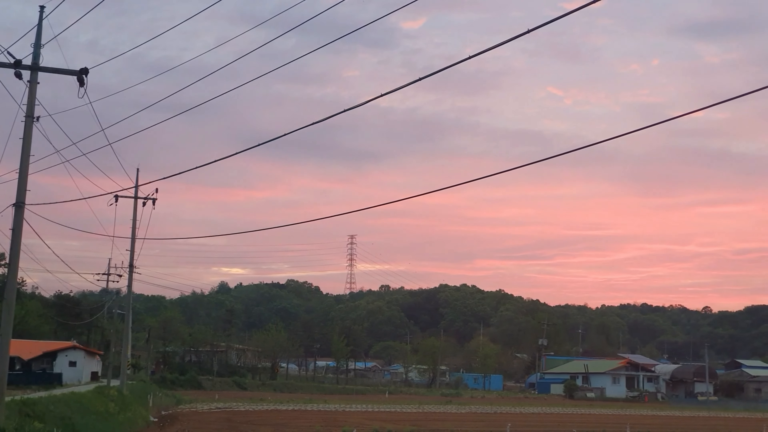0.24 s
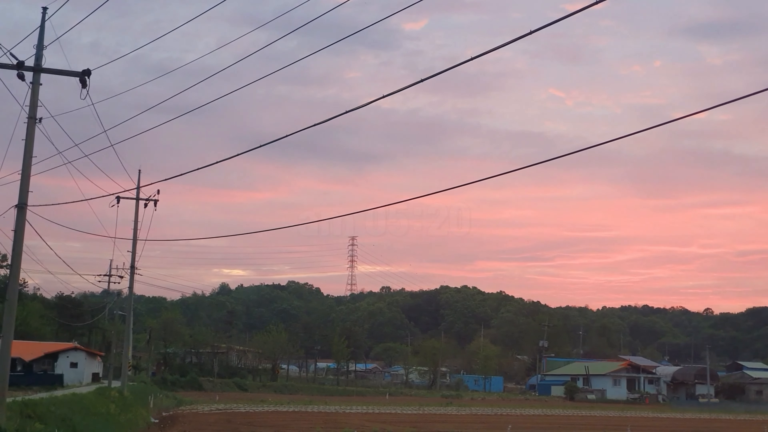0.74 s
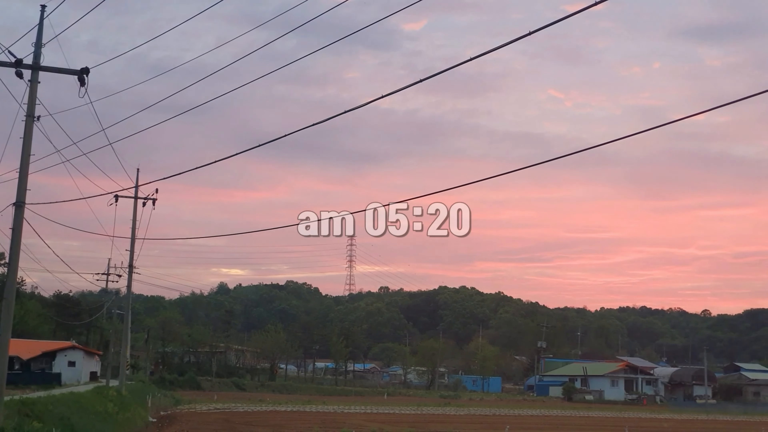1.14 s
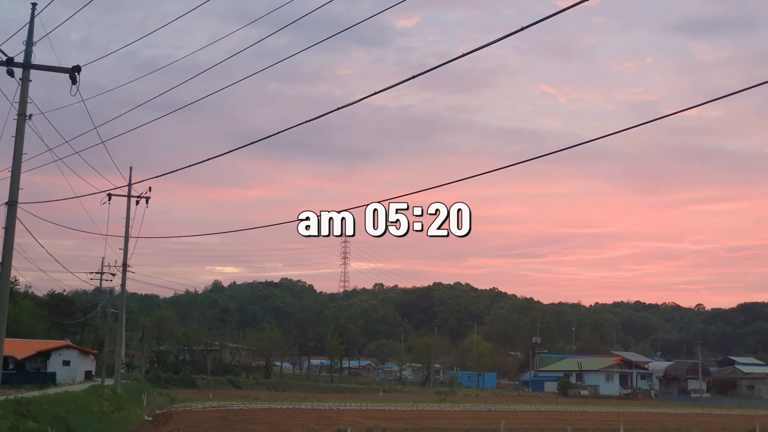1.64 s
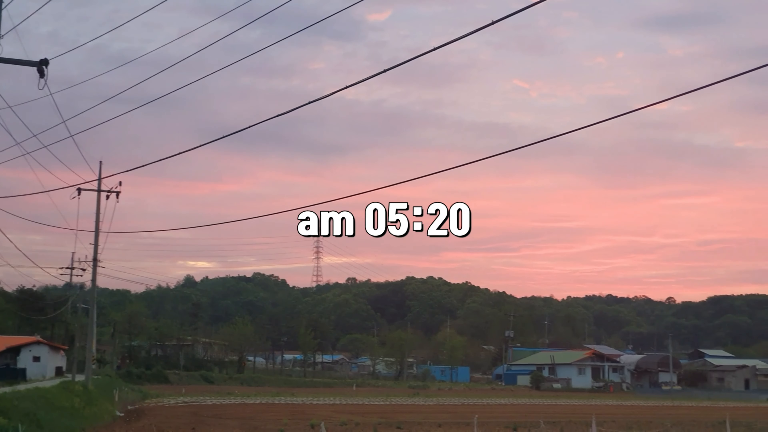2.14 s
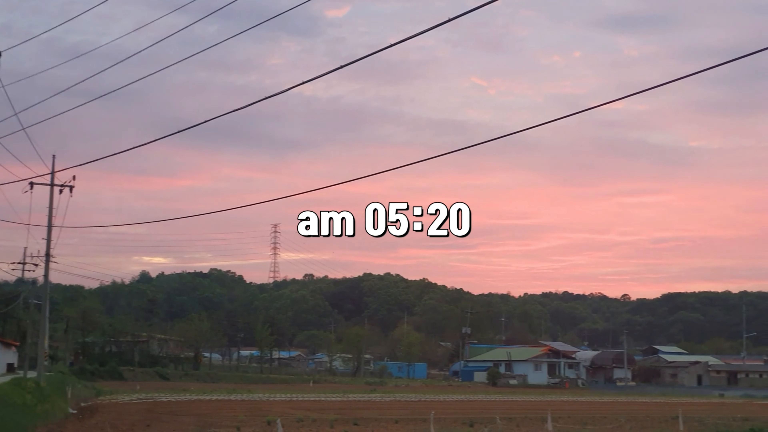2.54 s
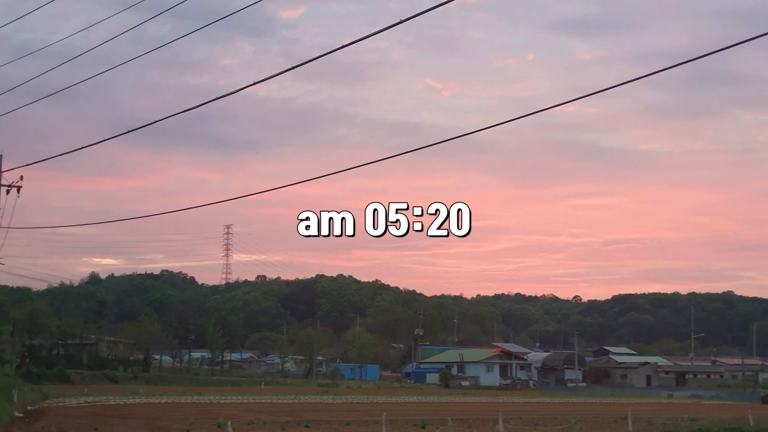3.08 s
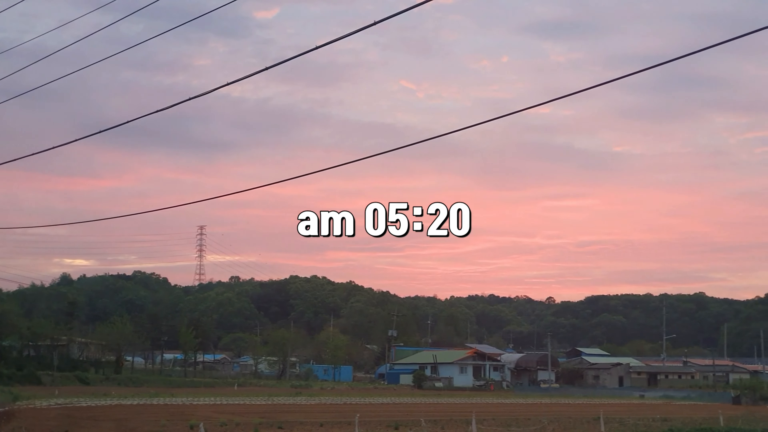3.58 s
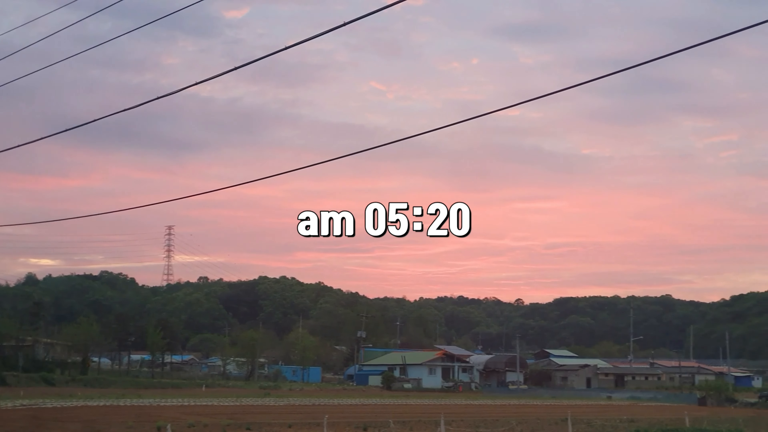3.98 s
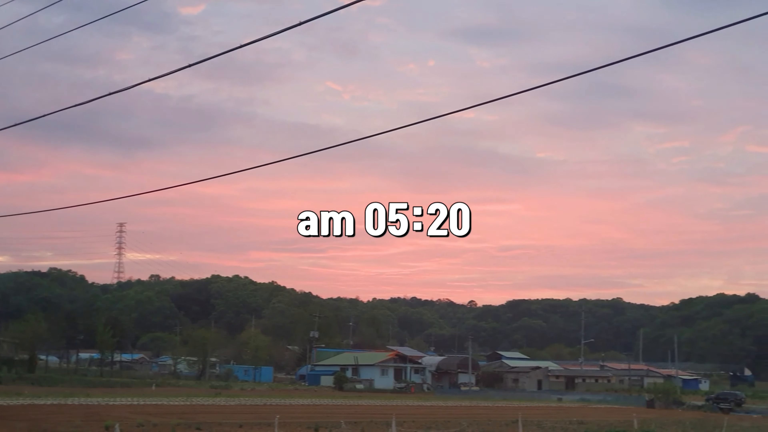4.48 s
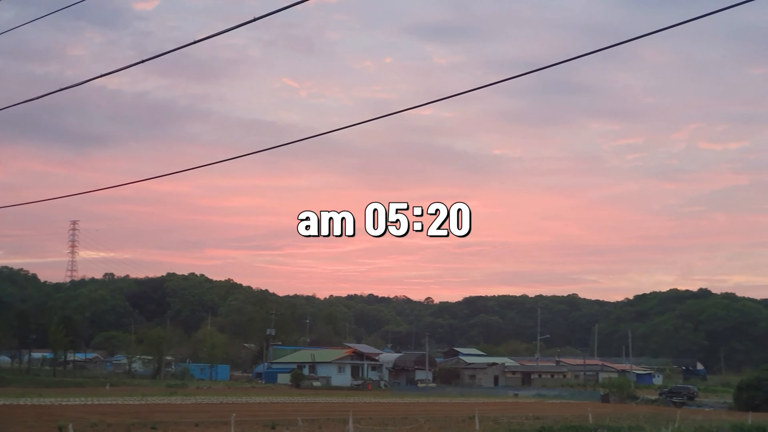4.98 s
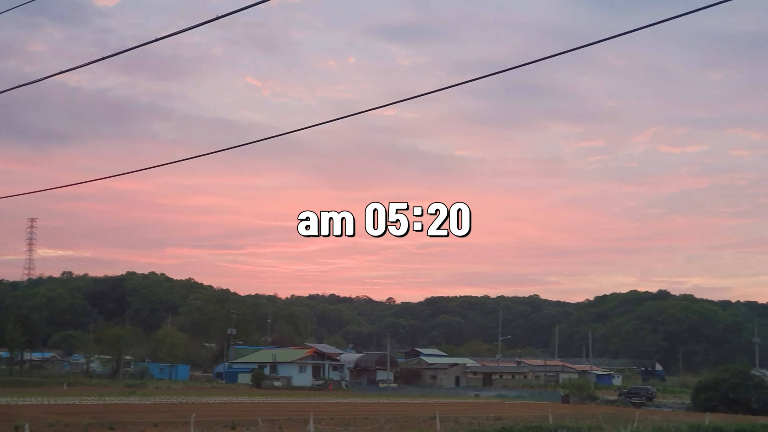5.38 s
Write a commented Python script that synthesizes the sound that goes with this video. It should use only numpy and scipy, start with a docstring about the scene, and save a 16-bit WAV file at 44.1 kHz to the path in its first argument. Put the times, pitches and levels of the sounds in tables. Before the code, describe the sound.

A dawn chorus of small birds chirping, trilling and whistling over open fields, while a distant cow moos once and a frog croaks near the end.

```python
"""After a moment of silence small birds twitter nearby, over faint air, a low hum and a far dawn chorus.
Others whistle long arcs; a far cow moos once and a frog croaks, by fields at the edge of a village.
Birds are gliding sines with warble and buzz; cow and frog are pulses ringing throat resonances;
the air is coloured noise. House fronts repeat the near callers and trees give them a soft tail.
Two closely spaced microphone ports hear callers with small lags and level differences."""
import sys
import numpy as np
from scipy import signal
from scipy.fft import rfft, irfft, next_fast_len
from scipy.io import wavfile
from scipy.ndimage import uniform_filter1d

SR = 44100
rng = np.random.default_rng(int(sys.argv[2]) if len(sys.argv) > 2 else 0)


def master(y):
    """Save y as 16-bit WAV."""
    cut = np.clip(np.atleast_2d(y).T, -1, 1)
    pcm = np.round(cut * 32767)  # scale
    wavfile.write(sys.argv[1], SR, pcm.astype(np.int16))


N = 247842
TIME = np.arange(N) / SR
STROKE = np.linspace(0, 1, 97)  # progress through one bird note


def undb(db):
    """Decibels to gain."""
    return 10 ** (np.asarray(db) / 20)


def unit(x):
    """Scale to rms 1."""
    return x / np.sqrt(np.mean(x ** 2) + 1e-18)


def walk(rate, size=N):
    """Smooth random wander with a spread near 1, drawing new steps at the given rate in Hz."""
    k = max(int(SR / rate), 1)
    steps = np.repeat(rng.standard_normal(size // k + 2), k)
    return 1.3 * uniform_filter1d(uniform_filter1d(steps, k), k)[:size]


def band(x, hz, width_hz):
    """A resonance applied twice, so that its skirts are steep."""
    b, a = signal.iirpeak(min(hz, .45 * SR), hz / width_hz, fs=SR)
    return signal.lfilter(b, a, signal.lfilter(b, a, x))


def gliding_band(x, hz, width_hz):
    """A steep resonance whose centre moves: shift it down to zero, low-pass, shift back up."""
    turn = np.exp(2j * np.pi * np.cumsum(hz) / SR)
    b, a = signal.butter(2, width_hz / 2, fs=SR)
    return 2 * np.real(turn * signal.lfilter(b, a, x / turn))


def ports(x, pan_db, lag_ms):
    """One caller at both ports: a left minus right level difference and a small delay on the right."""
    size = next_fast_len(len(x) + 64)
    turn = np.exp(-2j * np.pi * np.fft.rfftfreq(size, 1 / SR) * lag_ms / 1000)
    late = irfft(rfft(x, size) * turn, size)[:len(x)]
    gains = unit(undb([[pan_db / 2], [-pan_db / 2]]))
    return gains * np.array([x, late])


def add(out, s, x):
    """Mix x into out from time s in seconds."""
    i = int(np.clip(s * SR, 0, N - 1))
    out[..., i:i + x.shape[-1]] += x[..., :N - i]


def scatter(x, t60_s, build_s):
    """Countless weak echoes off leaves and walls, different at each port."""
    t = np.arange(int(1.5 * SR)) / SR
    envelope = np.exp(-np.log(1000) * t / t60_s) * (1 - np.exp(-t / build_s))
    tail = rng.standard_normal((2, len(t))) * envelope
    tail /= np.sqrt(np.sum(tail ** 2, axis=1, keepdims=True))
    return signal.fftconvolve(np.atleast_2d(x), tail, axes=1)[:, :N]


def arc(hz, glide, arch=0.039):
    """Pitch of a note that glides by some octaves, its ends lying a share (arch) under its middle."""
    return hz * (1 - arch * (2 * STROKE - 1) ** 2) * 2 ** (glide * (STROKE - .5))


def lean(hz, centre_hz=4650, db_per_octave=17.5):
    """Left minus right dB of a note: low notes lean to the left, high ones to the right."""
    return db_per_octave * np.log2(centre_hz / hz)


def note(length, pitches, harsh, push, warble_hz=220, warble_rate=200, buzz_hz=560, buzz_jitter=0.239,
         buzz_swing_hz=440, split_hz=650, second_side=1.0, grain=1.0, octave_db=-34, rasp_db=-19):
    """A quick bird note; harsh ones warble and buzz, and the syrinx's other side joins in lower."""
    u = np.linspace(0, 1, max(int(length * SR), 64))
    rates = (warble_rate, warble_rate, 1300, SR)
    wobble, flutter, shake, hiss = (walk(rate, SR // 7)[:len(u)] for rate in rates)
    glide_hz = np.interp(u, np.linspace(0, 1, len(pitches)), pitches)
    hz = glide_hz + harsh * warble_hz * wobble
    buzz = np.sin(2 * np.pi * np.cumsum(buzz_hz * (1 + buzz_jitter * flutter)) / SR)
    upper = 2 * np.pi * np.cumsum(hz + harsh * buzz_swing_hz * buzz) / SR
    lower = 2 * np.pi * np.cumsum(hz - split_hz + harsh * warble_hz * flutter) / SR
    both_sides = np.sin(upper) + harsh * second_side * np.sin(lower)
    tone = both_sides * (1 + harsh * grain * (shake + buzz))
    # a hard push of air adds the octave and a rasp that reaches far into the treble
    rasp = harsh * undb(rasp_db) * np.gradient(hiss)
    overtones = push * (undb(octave_db) * np.sin(2 * upper) + rasp)
    envelope = np.sqrt(np.abs(np.sin(np.pi * u))) * signal.windows.tukey(len(u), .25)
    return unit((tone + overtones) * envelope)


def air(wide_hz=900, level_db=-52.5, treble_db=-3):
    """Faint outdoor noise: the bass is restless and alike at both ports, the treble smooth and wide."""
    # colour of still morning air: pitch_hz [Hz], relative level_db [dB per Hz]
    air_colour = [(15, -30), (25, 7), (82, -0.5), (188, -5.5), (281, -6.5), (997, -18.5), (1490, -19.5),
                  (2560, -17), (3630, -26.5), (7300, -16.5), (9300, -32), (12200, -26), (15500, -28)]
    # distant rumble, relative gains: start_s [s], bass_db [dB], low_middle_db [dB]
    rumble = [(0.3, 1.5, 4.5), (0.7, 0, -2.5), (1.3, -0.5, 0), (2.05, 2.5, 3), (3.2, 5, 1.5),
              (4.5, 0.5, 3.5), (5.3, 5, 2)]
    points_hz, points_db = np.transpose(air_colour)
    hz = np.fft.rfftfreq(N, 1 / SR) + 1
    colour = undb(np.interp(np.log(hz), np.log(points_hz), points_db))
    colour *= undb(treble_db * np.exp(-np.log2(hz / 4200) ** 2))  # soften the hiss behind the birds
    width = np.clip(np.sqrt(hz / wide_hz), .35, 1)
    mid, side = rfft(rng.standard_normal((2, N)))
    spectrum = colour * (mid + np.array([[1], [-1]]) * width * side)
    s, *levels = np.transpose(rumble)
    bass_db, low_mid_db = (np.interp(TIME, s, c) for c in levels)
    out = 0
    for octave in range(4, 15):  # overlapping bands centred on 2 ** octave Hz
        share = np.clip(1 - np.abs(np.log2(hz) - octave), 0, 1)
        rumble_db = bass_db if octave < 7 else low_mid_db if octave < 10 else 0
        unrest = min(1, wide_hz / 2 ** octave)
        out = out + irfft(spectrum * share, N) * undb(rumble_db + unrest * 2.8 * walk(13))
    return undb(level_db) * out / np.std(out.mean(axis=0))


def hum(drift_hz=2.557, waver_db=3):
    """Low machine tones from the village waver on their way over the fields."""
    # steady tones before drift and waver: pitch_hz [Hz], level_db [dB]
    hum_tones = [(58.5, -61), (115, -60.5), (188, -63)]
    tones = np.zeros(N)
    for hz, db in hum_tones:
        phase = 2 * np.pi * np.cumsum(hz + drift_hz * walk(5.2)) / SR
        tones += undb(db + waver_db * walk(27)) * np.sin(phase)
    return ports(tones, 3.2, 0)


def far_birds(db=-51.5, centre_hz=4250, spread=.18, direct_db=-2, fade=0.57, count=520):
    """Chorus in the woods: many small sweeps, partly smeared to a shimmer, high ones faded by distance."""
    # how busy the chorus is: start_s [s], relative level_db [dB]
    chorus = [(0, -1), (1.05, -10), (1.25, -0.5), (1.7, -1.5), (5.6, 3)]
    out = np.zeros((2, N))
    for k, draws in enumerate(rng.standard_normal((count, 7))):
        when, length, pitch, arch, slope, size, side = draws
        hz = centre_hz * np.exp(2 * spread * np.tanh(.7 * pitch))
        length_s = .022 * np.exp(.4 * np.clip(length, -2, 2))
        x = note(length_s, arc(hz, .35 * slope, .1 * arch), .1, 0)
        loud = x * undb(5.7 * size) * (centre_hz / hz) ** fade
        add(out, (k + when / 2) * N / SR / count, ports(loud, 4 * side, 0.24 * side))
    busy = undb(np.interp(TIME, *np.transpose(chorus)))
    shimmer = scatter(out, t60_s=0.38, build_s=0.0022)
    return undb(db) * busy * unit(undb(direct_db) * out + shimmer)


def twitter(near_db=-27, bright_hz=5600, push_per_db=0.56, push_db=9):
    """Near birds; fainter notes come from further off, so more of them arrives through the foliage."""
    # the near birds' lag drifts: start_s [s], right_lag_ms [ms]
    lag_drift = [(2.4, -0.3363), (4.0, -0.4046)]
    direct, blurred = np.zeros((2, N)), np.zeros((2, N))
    notes = single_notes() + chirps() + chatter() + whits()
    notes += chatter(hz=6940, spread_octaves=.2, db=-58, count=30)
    for s, length, pitches, harsh, db, swell_db, pan_db in notes:
        height = min(np.median(pitches) / bright_hz, 1)
        push = height ** 3 * undb(push_per_db * (db - near_db) + push_db)  # high, loud notes take more air
        harsh = np.clip(harsh * height, 0, 1)  # low notes stay purer
        tone = note(length, pitches, harsh, push)
        swelled = unit(tone * undb(np.linspace(0, swell_db, len(tone))))
        x = undb(db) * ports(swelled, pan_db, np.interp(s, *np.transpose(lag_drift)))
        blur = np.interp(db, (-52, -40, -24), (.6, .36, .22))  # share of the power
        add(direct, s, np.sqrt(1 - blur) * x)
        add(blurred, s, np.sqrt(blur) * x)
    foliage = scatter(blurred, t60_s=0.105, build_s=0.0008)
    return undb(0.5) * (direct + foliage)


def single_notes(peep_harsh=0.065, buzz_harsh=0.562, buzz_glide=-0.144, buzz_swell_db=-1.0):
    """Nearly pure peeps and hoarse, slightly falling buzzes, one stroke each."""
    # peeps, levels before the group gain: start_s [s], length_s [s], pitch_hz [Hz],
    # glide_octaves [octaves], level_db [dB], swell_db [dB]
    peep_strokes = [(0.074, 0.096, 3150, -0.34, -43.5, 5.5), (0.107, 0.01, 4460, -0.38, -33.5, 5),
                    (0.15, 0.021, 2560, -0.09, -45.5, -6), (0.862, 0.024, 2765, -0.19, -40.5, -7),
                    (0.912, 0.015, 4640, -0.15, -37, 9), (1.154, 0.013, 4715, -0.15, -36, 8),
                    (1.174, 0.0042, 5000, -0.17, -60, -7), (1.334, 0.037, 3380, -0.2, -43.5, 24),
                    (1.361, 0.015, 3120, -0.1, -33.5, 2), (1.51, 0.0093, 3080, -0.76, -44.5, -1),
                    (1.593, 0.012, 6210, 0.013, -46.5, 0), (1.712, 0.017, 3380, 0.52, -44.5, -9),
                    (1.816, 0.035, 2650, -0.29, -43.5, -2), (1.861, 0.019, 2860, 0.25, -45.5, -2),
                    (1.886, 0.022, 3450, -0.48, -44.5, -3), (2.145, 0.014, 3083, 0.021, -39.5, -6),
                    (2.395, 0.014, 4960, 0.28, -27.5, 2), (2.434, 0.027, 5820, -0.38, -36.5, -1),
                    (2.57, 0.0203, 5820, 0.17, -47, 10), (2.644, 0.049, 3980, 0.253, -51, 6),
                    (2.646, 0.066, 8160, 0.28, -61, -5), (2.78, 0.011, 3050, -0.24, -41.5, 2),
                    (2.992, 0.0074, 3120, -0.51, -45.5, 6), (3.136, 0.049, 3050, 0.18, -49, -13),
                    (3.348, 0.0059, 3125, 0.02, -43, 2), (3.488, 0.0094, 3046, -0.14, -39.5, -17),
                    (3.736, 0.035, 3055, 0.25, -42.5, 9), (3.851, 0.036, 3620, 0.56, -45, -6),
                    (4.139, 0.024, 2670, -0.42, -47.5, -2), (4.244, 0.039, 3130, 0.38, -47, 5),
                    (4.727, 0.015, 4710, 0.033, -42, -17), (4.925, 0.016, 7060, -0.48, -48.5, 4),
                    (5.234, 0.015, 7000, 0.73, -42, -7), (5.262, 0.008, 7300, -0.39, -36, 2),
                    (5.274, 0.01, 7750, -0.65, -40, 8), (5.288, 0.019, 6370, -0.43, -37.5, -1)]
    # buzzes, levels before the group gain: start_s [s], length_s [s], pitch_hz [Hz], level_db [dB]
    buzz_strokes = [(0.085, 0.038, 6310, -39.5), (0.165, 0.057, 3040, -57), (0.533, 0.074, 4420, -48),
                    (1.115, 0.014, 3930, -46.5), (1.436, 0.02, 4230, -52), (2.052, 0.029, 4590, -39),
                    (2.041, 0.075, 7200, -53), (2.842, 0.028, 3830, -48.5), (3.228, 0.045, 4550, -45),
                    (3.959, 0.029, 4660, -45.5), (4.106, 0.032, 4655, -44.5), (4.423, 0.044, 4290, -47.5),
                    (4.525, 0.026, 4000, -47), (4.629, 0.049, 4165, -47), (5.16, 0.014, 4040, -35.5),
                    (5.244, 0.04, 4730, -44.5), (5.319, 0.13, 5840, -46)]
    notes = []
    for s, length, hz, glide, db, swell_db in peep_strokes:
        notes.append((s, length, arc(hz, glide), peep_harsh, db, swell_db, lean(hz)))
    for s, length, hz, db in buzz_strokes:
        notes.append((s, length, arc(hz, buzz_glide), buzz_harsh, db, buzz_swell_db, lean(hz)))
    return notes


def chirps(pan_db=-2, harsh=0.36):
    """Gliding strokes bounce in quick arches; the syrinx's two sides overlap, one high and one low."""
    # warbled strokes, levels before the group gain: start_s [s], length_s [s], from_hz [Hz], to_hz [Hz],
    # arches [count], arch_depth [share of pitch, negative dips], level_db [dB], swell_db [dB]
    chirp_strokes = [(0.117, 0.012, 7240, 6740, 2.2, 0.15, -44, -3),
                     (0.125, 0.027, 4600, 3360, 2.1, 0.19, -36.5, -14),
                     (0.804, 0.035, 5420, 4900, 1.08, 0.32, -32, 6),
                     (0.831, 0.038, 5040, 3510, 3.4, 0.33, -30.5, -11),
                     (0.843, 0.011, 7400, 7470, 2, -0.19, -42.5, -12),
                     (1.756, 0.038, 4860, 3470, 3.9, 0.17, -36.5, -6),
                     (1.795, 0.011, 7050, 7230, 1.3, 0.2, -38, -9),
                     (1.797, 0.032, 5950, 4680, 3.1, 0.25, -37, 3),
                     (2.329, 0.029, 4670, 7100, 1.1, -0.2, -36, 8),
                     (2.354, 0.027, 5280, 5070, 1.12, 0.2, -25, -1),
                     (2.376, 0.025, 5140, 4370, 1.8, 0.083, -23.5, -14),
                     (2.398, 0.07, 3874, 2900, 3.2, 0.04, -40.5, -13),
                     (2.406, 0.025, 7670, 6840, 1.51, -0.28, -35.5, -13),
                     (2.432, 0.026, 6370, 5480, 2.8, -0.063, -34, -10),
                     (3.026, 0.041, 4950, 6720, 1.3, -0.153, -33, 13),
                     (3.062, 0.017, 4914, 4670, 1.06, 0.27, -23, 3),
                     (3.08, 0.017, 4670, 3700, 2.5, 0.32, -38.5, -2),
                     (3.082, 0.019, 7060, 7480, 1.05, -0.23, -30, -9),
                     (3.094, 0.037, 7480, 5580, 2.2, -0.13, -36, 9),
                     (3.099, 0.021, 3065, 2830, 0.95, -0.061, -44, 0),
                     (3.621, 0.031, 5104, 4355, 2.23, 0.36, -37, 4),
                     (3.653, 0.022, 2900, 2380, 1.15, 0.058, -53, 7),
                     (4.296, 0.024, 5300, 6280, 1.16, 0.11, -37.5, 4),
                     (4.314, 0.032, 5430, 4384, 2.87, 0.17, -28.5, 2),
                     (4.352, 0.027, 3813, 3460, 1.9, 0.07, -36.5, -17),
                     (4.744, 0.017, 5950, 6100, 0.8, -0.05, -44, 1),
                     (4.76, 0.026, 4915, 4020, 1.97, 0.29, -32, -1),
                     (4.786, 0.027, 3624, 2800, 2.66, 0.11, -46.5, 7)]
    notes = []
    for s, length, from_hz, to_hz, arches, depth, db, swell_db in chirp_strokes:
        bounce = np.abs(np.sin(np.pi * arches * STROKE)) - 2 / np.pi
        pitches = from_hz * (to_hz / from_hz) ** STROKE * (1 + depth * bounce)
        notes.append((s, length, pitches, harsh, db, swell_db, pan_db))
    return notes


def whistlers(waver=0.0032, flutter_db=2.33, fall_flutter_db=6, octave_db=-54, thin_hz=9000):
    """Almost pure tones scoop up as they swell, hold, then fall away; the very high ones break up."""
    # arched whistles: start_s [s], hold_s until the fall [s], slide_s [s], top_hz [Hz],
    # fall_depth [0-1], level_db before shaping [dB], left_minus_right_db [dB], right_lag_ms [ms]
    whistle_arcs = [(0.245, 0.19, 0.016, 4433, 0.28, -28, -4.5, -0.36),
                    (0.586, 0.13, 0.034, 3730, 0.42, -53, 14.5, 0.41),
                    (0.608, 0.1806, 0.014, 4654, 0.53, -28, -6, -0.3),
                    (0.953, 0.15, 0.046, 4220, 0.37, -58.5, 7, 0.32),
                    (4.42, 0.19, 0.013, 10700, 0, -60, 21, 0),
                    (4.581, 0.18, 0.015, 11800, 0.3, -56.5, 29, 0),
                    (4.841, 0.35, 0.064, 3844, 0.37, -51, 4, -0.078),
                    (5.363, 0.18, 0.021, 4440, 0.2, -33.5, -8.5, -0.41)]
    scoop, scoop_s, swell_db, swell_s = 0.11, 0.022, 21, 0.02  # scoop is a share of the pitch
    fade_db, release_slides, slide_skew = 26, 6.5, 0.35  # release lasts this many slide times
    out = np.zeros((2, N))
    for s, hold_s, slide_s, top_hz, depth, db, pan_db, lag_ms in whistle_arcs:
        t = np.arange(0, hold_s + release_slides * slide_s, 1 / SR)
        # tips over quickly, levels out slowly
        fallen = 1 - (1 + np.exp((t - hold_s) / slide_s)) ** -slide_skew
        pitch = top_hz * (1 - scoop * np.exp(-t / scoop_s)) * (1 - depth * fallen)
        pitch *= 1 + waver * walk(127.6)[:len(t)]
        phase = 2 * np.pi * np.cumsum(pitch) / SR
        shape_db = -swell_db * np.exp(-t / swell_s) - fade_db * fallen ** 1.62
        if top_hz > thin_hz:
            shape_db += 7 * (np.minimum(walk(60)[:len(t)], .8) - .9)
        shape_db += (flutter_db + fall_flutter_db * fallen) * walk(149.4)[:len(t)]
        loud = undb(db + shape_db) * signal.windows.tukey(len(t), .08)
        tone = unit(np.sin(phase) + undb(octave_db) * np.sin(2 * phase))
        add(out, s, ports(loud * tone, pan_db, lag_ms))
    return out


def chatter(from_s=1.2, until_s=5.2, hz=3900, spread_octaves=0.46, glide=0.355, arch=0.111,
            length_s=0.0219, harsh=0.14, db=-53.0, count=48):
    """Thin, soft sweeps at chance moments among the louder calls."""
    notes = []
    for k, (when, pitch, slope, bend, size) in enumerate(rng.uniform(-1, 1, (count, 5))):
        s = from_s + (until_s - from_s) * (k + when / 2) / count
        pitch_hz = hz * 2 ** (spread_octaves * pitch)
        pitches = arc(pitch_hz, glide * slope, arch * bend)
        notes.append((s, length_s, pitches, harsh, db + 2 * size, 0, lean(pitch_hz)))
    return notes


def whits(pan_db=-3.0, harsh=0.035):
    """Clear "whit-chip" calls: a flick up to a point and down, then after a gap one short chip."""
    # calls, levels before the group gain: start_s [s], whit_level_db [dB], chip_level_db [dB]
    whit_calls = [(1.612, -29, -31), (3.785, -31, -24)]
    # the flick's evenly spaced pitches: pitch_hz [Hz]
    flick_hz = (4370, 4230, 4830, 4780, 5820, 4430, 4000)
    whit_s, chip_after_s, chip_s = 0.02, 0.034, 0.019  # the chip is timed from the call's start
    chip = arc(4135, 0.07)
    notes = []
    for s, db, chip_db in whit_calls:
        notes.append((s, whit_s, flick_hz, harsh, db, -2, pan_db))
        notes.append((s + chip_after_s, chip_s, chip, harsh, chip_db, 0, pan_db))
    return notes


def cow(breath=0.027, direct_db=-7, echo_db=-2):
    """Hoarse glottal pulses ring a throat that changes as the mouth opens; far off, so mostly echo."""
    # the moo before unsteadiness and mix gains: start_s [s], pitch_hz [Hz], level_db [dB], mouth [0-1]
    moo_path = [(1.748, 131.8, -62, 0.48), (1.983, 145.5, -57, 0.36), (2.352, 140.6, -58.5, 0.44),
                (2.699, 138.2, -54, 0.85), (3.349, 143.6, -57, 0.86), (3.745, 143, -55.5, 0.62),
                (4.147, 142.5, -60.5, 0.3), (4.5, 137.2, -60, 0.72), (4.85, 131.2, -60.5, 0.49)]
    # upper throat: centre_hz [Hz], width_hz [Hz], shut_db [dB, mouth shut], open_db [dB, mouth open]
    cow_throat = [(975, 129, -15, 4.5), (1357, 47, -18, -15), (1710, 58, -2.5, -13.5)]
    # moving lowest resonance: start_s [s], centre_hz [Hz], relative level_db [dB]
    low_path = [(2.0, 456, 0), (2.8, 485, -6), (3.75, 545, -6.5), (4.7, 520, -2.5)]
    s, *columns = np.transpose(moo_path)
    hz, db, mouth = (np.interp(TIME, s, c) for c in columns)
    unsteady = 1 + .025 * walk(22) + .045 * walk(140)
    phase = np.cumsum(hz * unsteady) / SR
    pulses = np.diff(np.floor(phase), prepend=0) + breath * rng.standard_normal(N)

    def fading_db():
        """Moving air fades each resonance on its own."""
        return 3.5 * walk(16)

    voice = np.zeros(N)
    for f, width, shut, wide in cow_throat:
        voice += undb(shut + mouth * (wide - shut) + fading_db()) * band(pulses, f, width)
    low_s, *low_columns = np.transpose(low_path)
    low_hz, low_db = (np.interp(TIME, low_s, c) for c in low_columns)
    voice += undb(low_db + fading_db()) * gliding_band(pulses, low_hz, width_hz=89)
    moo = unit(voice) * undb(db) * (TIME > s[0]) * (TIME < s[-1])
    valley = scatter(moo, t60_s=0.33, build_s=0.013)
    return undb(direct_db) * ports(moo + valley[0], 0.2, -0.12) + undb(echo_db) * valley


def frog(pulse_hz=190, jitter=.2, breath=0.009, lag_per_hz=.000008, vary=0.0154):
    """Uneven clicks ring a small throat whose resonances rise in each croak, upper ones joining later."""
    # croaks, levels before throat and mix gains: start_s [s], length_s [s], level_db [dB]
    croaks = [(4.989, 0.032, -48.5), (5.094, 0.11, -45.5), (5.203, 0.037, -38), (5.319, 0.092, -41),
              (5.424, 0.024, -36)]
    # throat: centre_hz [Hz], width_hz [Hz], gain_db [dB], rise [share per s]
    frog_throat = [(2073, 198, 2, 0.93), (2340, 210, -5, 1.6), (2770, 190, -5, 2.4)]
    phase = np.cumsum(pulse_hz * (1 + jitter * walk(200))) / SR
    clicks = np.diff(np.floor(phase), prepend=0) * undb(2.7 * walk(200))
    clicks += breath * rng.standard_normal(N)
    out = np.zeros(N)
    for hz, width, throat_db, rise_per_s in frog_throat:
        for s, length, db in croaks:
            t = np.arange(int(length * SR)) / SR
            tension = 1 + vary * rng.standard_normal() + rise_per_s * (t - length / 2)
            late = length / 0.069 * lag_per_hz * (hz - frog_throat[0][0])  # longer croaks spread more
            excitation = clicks[int((s + late) * SR):][:len(t)]
            croak = gliding_band(excitation, hz * tension, width)
            add(out, s + late, undb(db + throat_db) * unit(croak * signal.windows.hann(len(t))))
    tail = undb(-5.5) * scatter(out, t60_s=0.065, build_s=0.0012)
    return undb(-5.5) * (ports(out, -3.7, 0.044) + tail)


def house_echoes(x):
    """A few distinct, weaker repeats of each call from the house fronts."""
    # house fronts: delay_s [s], level_db [dB], left_minus_right_db [dB]
    walls = [(0.019, -15, 9), (0.052, -22.5, 4)]
    out = np.zeros((2, N))
    for delay_s, db, pan_db in walls:
        add(out, delay_s, undb(db) * ports(x, pan_db, 0))
    return out


def scene():
    """All callers, the near ones' echoes from houses and trees, and the background."""
    background = air() + hum() + far_birds()
    near = twitter() + whistlers() + frog()
    trees = undb(-21) * scatter(near[1], t60_s=.5, build_s=.02)
    return background + near + house_echoes(near[0]) + trees + cow()


def record(dry, start_s=.086, top_hz=15800):
    """The sound opens after a moment of silence; a steep low-pass cuts the top."""
    low_pass = signal.ellip(10, .2, 70, top_hz, fs=SR, output="sos")
    return signal.sosfilt(low_pass, dry * (TIME >= start_s))


dry = scene()
out = record(dry)
master(out)
```